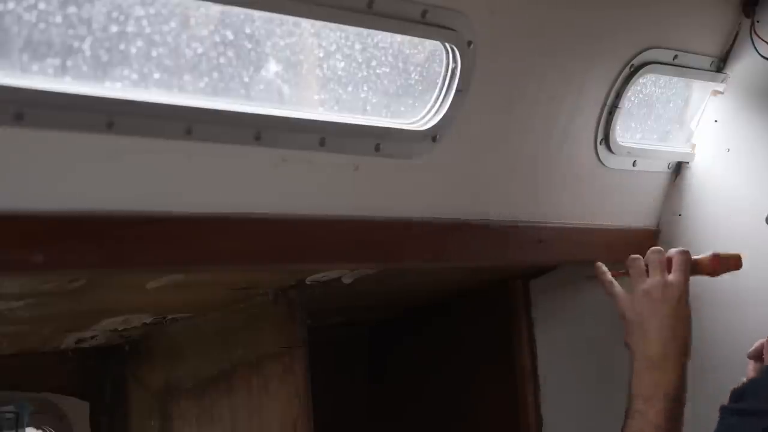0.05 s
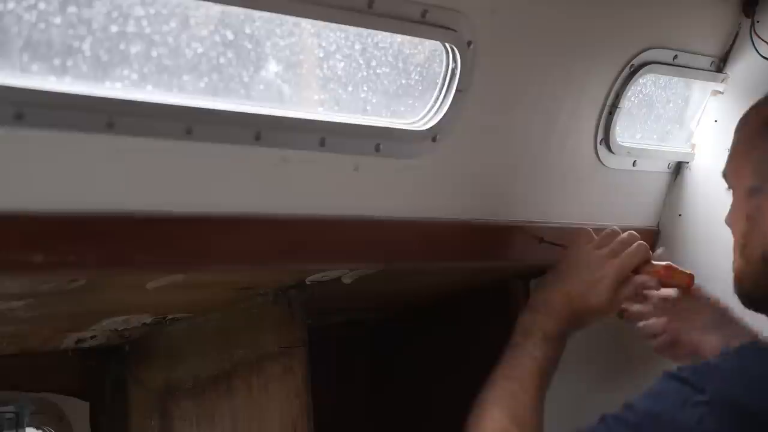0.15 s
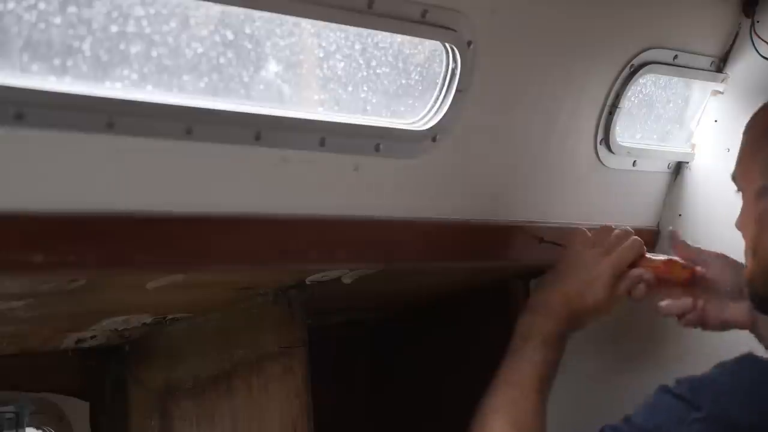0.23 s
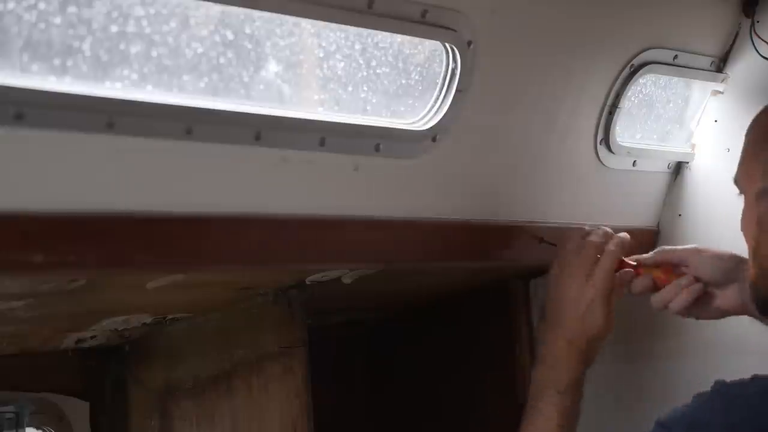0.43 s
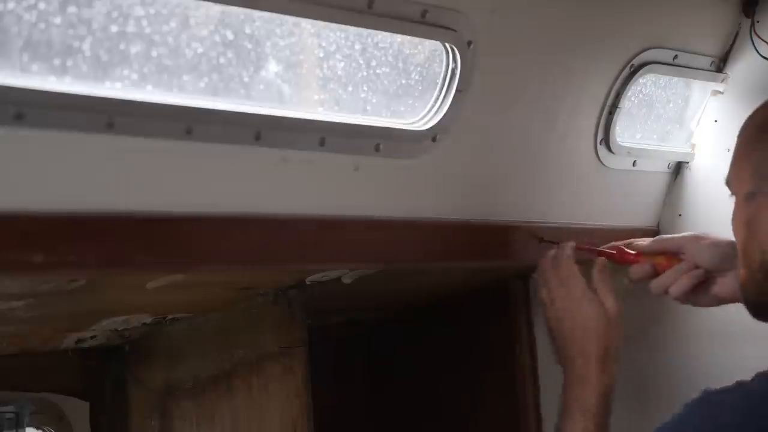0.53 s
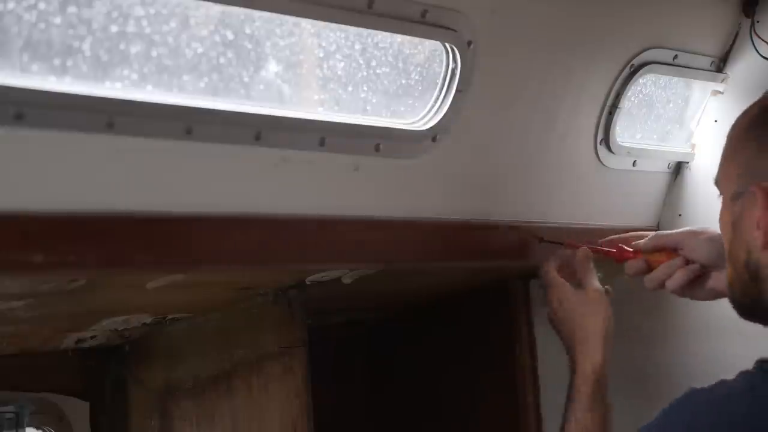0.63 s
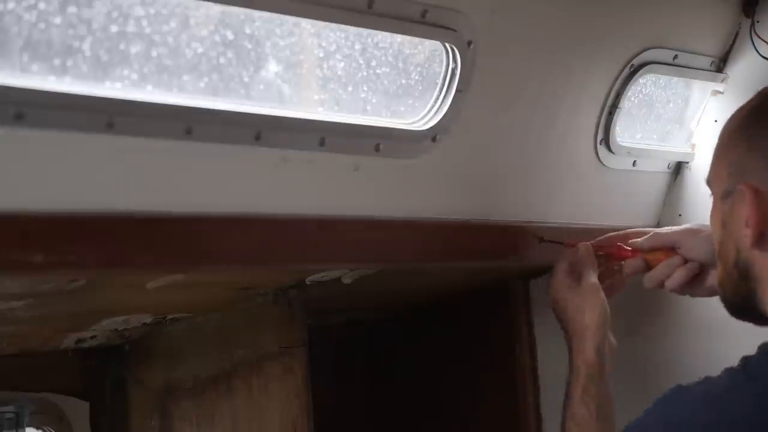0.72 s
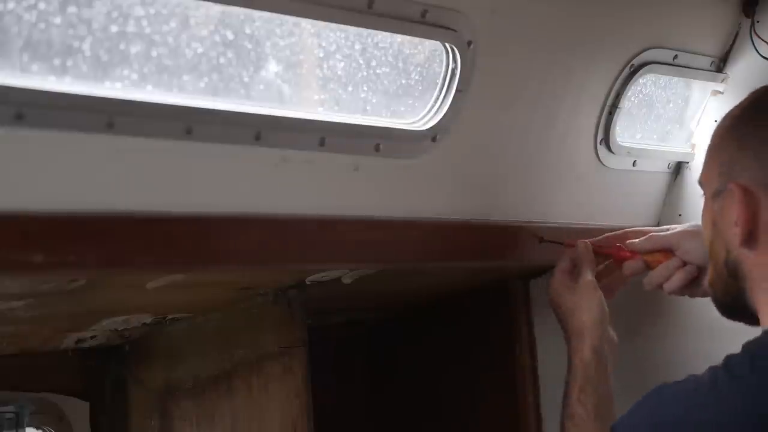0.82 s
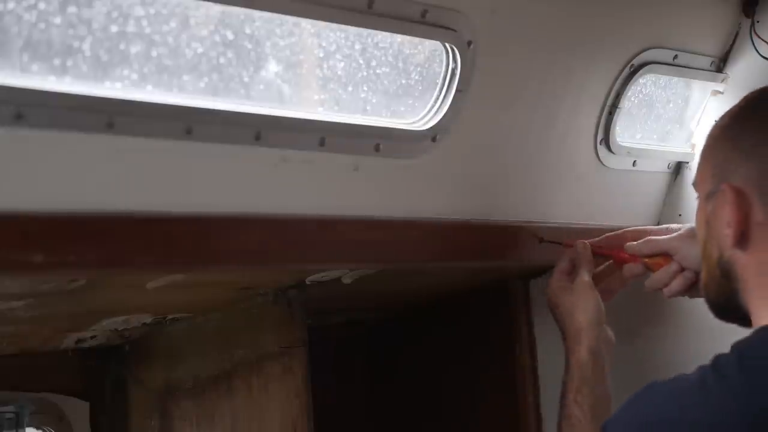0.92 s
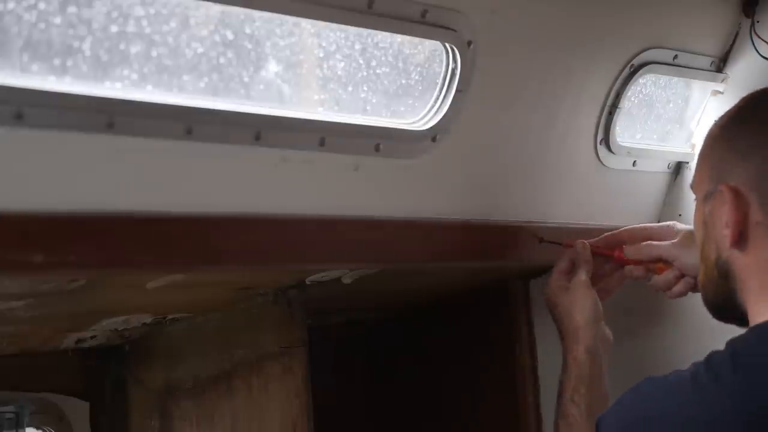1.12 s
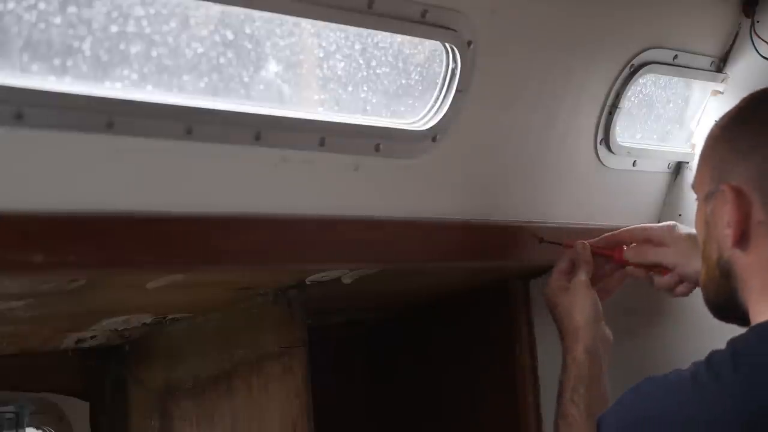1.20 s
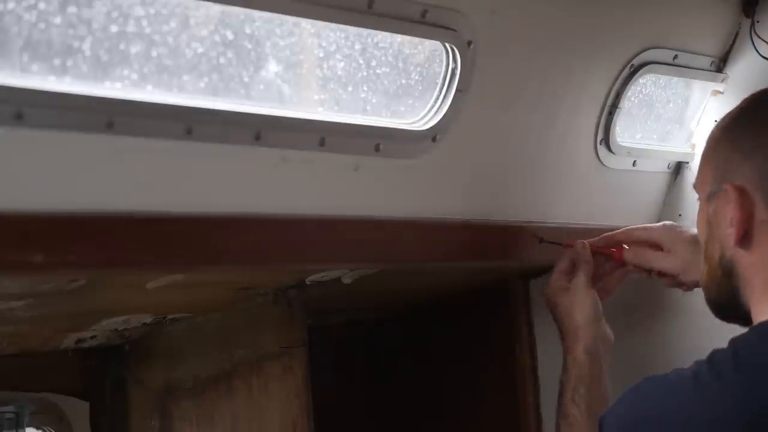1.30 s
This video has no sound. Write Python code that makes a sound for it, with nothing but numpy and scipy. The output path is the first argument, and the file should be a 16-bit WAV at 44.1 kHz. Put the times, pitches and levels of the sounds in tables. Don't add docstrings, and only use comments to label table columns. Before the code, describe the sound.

One hard, hollow knock of a hand tool on a wooden trim strip dominates, at about 0.2 s, after faint hiss and low hull rumble. The wood booms, with a slight steel ring, and the small boat cabin hums as it decays. A soft sleeve rustle follows from 0.3 s, then faint stuttering blade scrapes from 0.7 to 1.1 s and dry ticks around 1.1 s. Close microphone.

```python
import sys
import numpy as np
from scipy import signal
from scipy.fft import rfft, irfft, next_fast_len
from scipy.io import wavfile
from scipy.ndimage import uniform_filter1d, map_coordinates

SR = 44100
rng = np.random.default_rng(int(sys.argv[2]) if len(sys.argv) > 2 else 0)


def digitize_waveform(pressure):
    field = np.atleast_2d(pressure).T
    bounded = np.clip(field, -1, 1)
    quanta = np.round(bounded * 32767).astype(np.int16)
    wavfile.write(sys.argv[1], SR, quanta)


def decibels_to_gain(level_db):
    exponent = np.asarray(level_db, float) / 20
    return 10 ** exponent


N = 59535

# pitch_hz, density_db_per_hz
HISS_COLOUR = [(20, -19), (50, 3), (100, -2), (215, -11), (280, -13.5), (1000, -21.5), (9000, -29),
               (15900, -36)]
# time_s, level_db
HANDLING = [(0, -52.5), (.07, -74), (.2, -86.5), (.3, -44), (.6, -56), (.8, -49), (1.05, -57.5),
            (1.2, -60.5), (1.35, -62)]
# pitch_hz, density_db_per_hz
RUMBLE_COLOUR = [(15, -8), (30, -17.5), (58, 5.5), (90, 0.5), (120, -4.5), (215, 1.5), (270, -27),
                 (900, -46)]
# time_s, level_db
SWING = [(.172, -84), (.2, -66), (.217, -72.5)]
# pitch_hz, density_db_per_hz
SWISH_COLOUR = [(150, -28.5), (350, -1.5), (800, -2.5), (1800, -35), (4000, -53.5)]
# pitch_hz, level_db, t60_s, rise_s
THUD_MODES = [(95, -14.5, 0.051, 0.0009), (201, -51, 0.033, .002), (346.4, -5, .12, 0.014),
              (497, -12.5, 0.21, 0.01), (881, -8.5, 0.11, 0.0018), (711, -7, 0.041, 0.0014),
              (790, -5, 0.02, 0.00036)]
# pitch_hz, level_db, t60_s
WOOD_MODES = [(127.3, -3.5, 0.32), (305.9, 1.5, 0.37), (360, 2, 0.32), (428, -0.5, 0.72), (476.2, -2, 0.75),
              (519.4, 0.5, 0.25), (543, 0.5, 0.33), (661.5, -2, 0.35), (664, -32, 0.38),
              (753.7, -6.5, 0.57), (821, -3.5, 0.91), (896, 2, 0.37), (1129, -18.5, 0.34),
              (1263, -15, 0.56)]
# pitch_hz, level_db, t60_s
STRIP_MODES = [(1353, 5, 0.2), (1588, -12, 0.41), (1655, -1.5, 0.16), (1793, -1, 0.27), (2008, -23.5, 0.3),
               (2110, -25.5, 0.24), (2375, -12, 0.39), (2840, -12.5, 0.36)]
# pitch_hz, level_db, t60_s, rise_s
STEEL_MODES = [(3620, -43.5, 0.33, .002), (5530, -35.5, 0.28, 0.022), (5970, -48.5, 0.13, 0.0016),
               (7418, -50, .18, .01), (7700, -61.5, .15, .002), (9050, -57.5, .14, .002),
               (9900, -63, .1, .002), (11540, -64.5, .16, .002), (13300, -70.5, .3, .002),
               (13500, -75.5, .3, .002)]
# pitch_hz, level_db, t60_s
HULL_MODES = [(85.4, -35.5, .9), (155.9, -22, 0.31), (175, -28.5, 1.4), (313.5, -35, 3.44), (320, -47, 3.8),
              (381, -39, 1), (406.7, -37, 2.2), (445, -40.5, 2.1), (440, -42, 1.2)]
# pitch_hz, density_db_per_hz
BOOM_COLOUR = [(25, -28), (70, -11.5), (240, -23), (320, -14), (900, -9.5), (960, -13), (5000, -44.5),
               (15500, -80)]
# pitch_hz, t60_s
CABIN_DECAY = [(60, .8), (250, 0.89), (1000, 0.41), (4000, 0.25), (12000, .2)]
# time_s, level_db
SLEEVE_MOTIONS = [
    [(.29, -62.5), (.4, -66), (.42, -70), (.46, -60), (.495, -61.5), (.53, -71.5), (.56, -65.5),
     (.64, -67.5)],
    [(.66, -72.5), (.71, -59.5), (.735, -69), (.76, -72), (1.05, -73), (1.09, -66), (1.2, -69.5),
     (1.24, -74), (1.34, -78)],
]
# pitch_hz, density_db_per_hz
CLOTH_COLOUR = [(1470, -41), (2500, 2), (3010, -11.5), (4260, -6.5), (5710, -2), (7890, -2), (11700, -9.5),
                (15800, -19)]
# time_s, pressure_db
DRAG = [(.66, -54.5), (.71, -58.5), (.8, -48.5), (.9, -43.5), (1, -38.5), (1.08, -52), (1.15, -51),
        (1.25, -65.5), (1.34, -72)]
# start_s, peak_db
SLIPS = [(0.7084, -42), (0.7555, -43.5), (0.79, -48.5), (0.821, -41), (0.851, -33), (0.8818, -29.5),
         (0.9118, -32.5), (0.9446, -36.5), (0.9808, -36.5), (1.0154, -36.5), (1.035, -40), (1.0614, -35.5),
         (1.0844, -38)]
# pitch_hz, density_db_per_hz
SCRAPE_COLOUR = [(40, -27), (150, -11.5), (350, -5.5), (700, -7), (1300, -9), (3200, -16), (6000, -32),
                 (15500, -52)]
# pitch_hz, level_db, t60_s, rise_s
NUDGE_MODES = [(119.1, -38, 0.34, 0.025), (315, -43, 0.36, 0.022), (547, -43, 0.51, 0.014),
               (658, -44, 0.68, 0.033)]
# start_s, peak_db
TICKS = [
    (1.0784, -31),
    (1.1124, -39),
    (1.1344, -49),
    (1.1603, -36),
]
# pitch_hz, density_db_per_hz
TICK_COLOUR = [(500, -31), (1200, 1), (4200, -13), (5400, -3.5), (6500, -0.5), (9000, -6.5), (12000, -11.5),
               (16000, -11)]

KNOCK_S = .2176


def wobble(rate):
    return map_coordinates(rng.standard_normal(2000), [np.arange(N) * rate / SR])


def unit(x):
    return x / np.sqrt(np.mean(x ** 2) + 1e-20)


def along(points, hz):
    f, v = np.transpose(points)
    return np.interp(np.log(hz + 1), np.log(f + 1), v)


def stroke(rows):
    s, db = np.transpose(rows)
    t = np.arange(N) / SR
    outside = np.maximum(s[0] - t, 0) + np.maximum(t - s[-1], 0)
    return decibels_to_gain(np.interp(t, s, db) - 300 * outside)


def noise(colour, patchy_db, grit_db=0):
    length = N + SR // 4
    white = rng.standard_normal(length)
    grit = np.resize(decibels_to_gain(grit_db * wobble(700)), length)
    z = signal.stft(white * grit, nperseg=512)[2]
    patches = uniform_filter1d(rng.standard_normal(z.shape), size=6, axis=0)
    patches = unit(uniform_filter1d(patches, size=5, axis=1))
    x = signal.istft(z * decibels_to_gain(patchy_db * patches), nperseg=512)[1][:length]
    gain = decibels_to_gain(along(colour, np.fft.rfftfreq(len(x), 1 / SR)))
    return unit(irfft(rfft(x) * gain, len(x))[:N])


def since(s):
    t = np.arange(N) / SR - s
    return np.maximum(t, 0), t >= 0


def bursts(events, t60, rise):
    total = np.zeros(N)
    for s, db in events:
        t, on = since(s)
        total += (on * decibels_to_gain(db - 60 * t / t60) * (1 - np.exp(-t / rise))) ** 2
    return np.sqrt(total)


def ring(hz, db, t60, rise, unsteady=0., start=KNOCK_S):
    t, on = since(start)
    sway = unsteady * wobble(25) * (1 - np.exp(-t / .03))
    return decibels_to_gain(db - 60 * t / t60) * (1 - np.exp(-t / rise)) * np.sin(2 * np.pi * hz * t + sway)


def microphone_hiss():
    return decibels_to_gain(-69.5) * noise(HISS_COLOUR, patchy_db=1.5)


def hull_rumble():
    return stroke(HANDLING) * noise(RUMBLE_COLOUR, patchy_db=-0.5)


def swing():
    return stroke(SWING) * noise(SWISH_COLOUR, patchy_db=0.5)


def thud():
    return sum((-1) ** k * ring(*mode) for k, mode in enumerate(THUD_MODES))


def wood():
    flicker_db, longest_s, rise_s = 1.5, .43, .003
    x = np.zeros(N)
    for k, (hz, db, t60) in enumerate(WOOD_MODES):
        flicker = decibels_to_gain(flicker_db * wobble(30.1))
        x += (-1) ** k * flicker * ring(hz, -18 + db, min(t60, longest_s), rise_s, unsteady=0.51)
    return x + sum(ring(hz, -31.5 + db, t60, .001, unsteady=.5) for hz, db, t60 in STRIP_MODES)


def steel():
    flicker_db = 1.2
    return sum(decibels_to_gain(flicker_db * wobble(100)) * ring(*mode, unsteady=.3) for mode in STEEL_MODES)


def hull():
    return sum((-1) ** k * ring(*mode, rise=.02) for k, mode in enumerate(HULL_MODES))


def boom():
    level_db, after_db, after_longer, rise_s = -22, -30, 7.9, 0.00027
    hz, t, z = signal.stft(rng.standard_normal(N), SR, nperseg=512)
    fall = -60 * np.maximum(t - KNOCK_S, 0) / along(CABIN_DECAY, hz)[:, None]
    decay = decibels_to_gain(fall) + decibels_to_gain(after_db + fall / after_longer)
    x = signal.istft(z * decibels_to_gain(along(BOOM_COLOUR, hz))[:, None] * decay, SR, nperseg=512)[1][:N]
    t, on = since(KNOCK_S)
    first_30_ms = on & (t < .03)
    return decibels_to_gain(level_db) * x / np.std(x[first_30_ms]) * (1 - np.exp(-t / rise_s))


def knock():
    return wood() + steel() + hull() + thud() + boom()


def rustle():
    return sum(stroke(motion) for motion in SLEEVE_MOTIONS) * noise(CLOTH_COLOUR, patchy_db=0)


def shaken_wood(force):
    m = next_fast_len(N + SR)
    f = np.fft.rfftfreq(m, 1 / SR)
    body = 0
    for k, (hz, _, t60) in enumerate([*WOOD_MODES, *HULL_MODES]):
        width = 5 / t60 + 4
        body = body + (-1) ** k * 1j * f * width / (hz * hz - f * f + 1j * f * width)
    return 4 * irfft(rfft(force, m) * body, m)[:N]


def scrape():
    slip = decibels_to_gain(-8) * bursts(SLIPS, t60=0.12, rise=0.00077)
    jolt = decibels_to_gain(-6.5) * bursts(SLIPS, t60=0.0059, rise=0.00017)
    drag = decibels_to_gain(-4.5) * stroke(DRAG)
    rub = (slip + jolt + drag) * noise(SCRAPE_COLOUR, patchy_db=2, grit_db=0.5)
    return rub + decibels_to_gain(-8.5) * shaken_wood(rub)


def nudge():
    return sum(ring(*mode, unsteady=0.68, start=0.93) for mode in NUDGE_MODES)


def ticks():
    crack = bursts(TICKS, t60=0.016, rise=.0003) * noise(TICK_COLOUR, patchy_db=2)
    tail = decibels_to_gain(-11) * bursts(TICKS, t60=.07, rise=.003) * noise(TICK_COLOUR, patchy_db=1.5)
    return decibels_to_gain(-5) * (crack + tail)


def scene():
    x = knock() + swing() + scrape() + nudge() + ticks()
    x = x + rustle() + hull_rumble() + microphone_hiss()
    return signal.sosfilt(signal.butter(6, 15700, fs=SR, output="sos"), x)[None]


def top_cut(x):
    return signal.sosfilt(signal.butter(12, 16480, fs=SR, output="sos"), x)


def record(dry):
    return top_cut(dry)


dry = scene()
out = record(dry)
digitize_waveform(out)
```